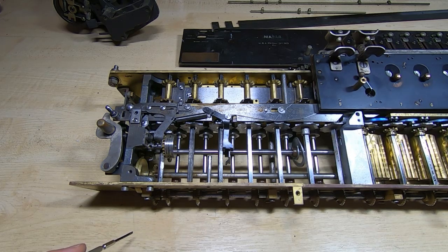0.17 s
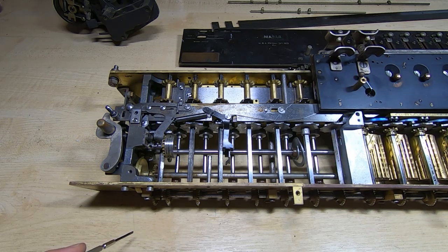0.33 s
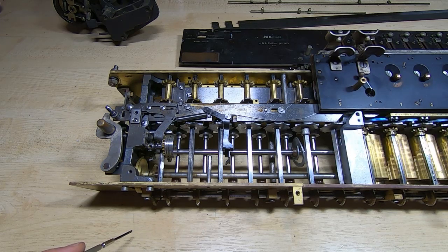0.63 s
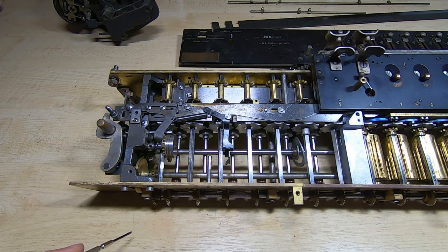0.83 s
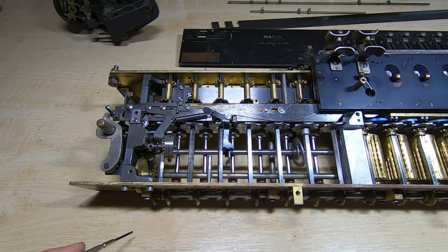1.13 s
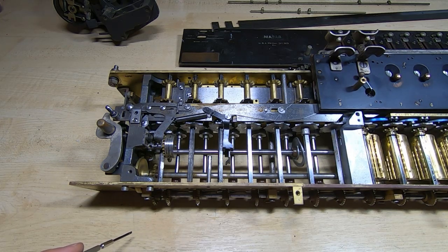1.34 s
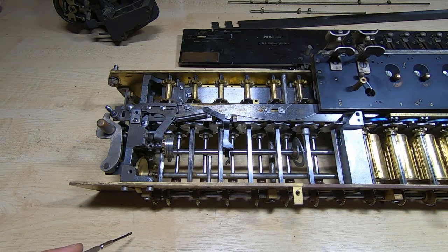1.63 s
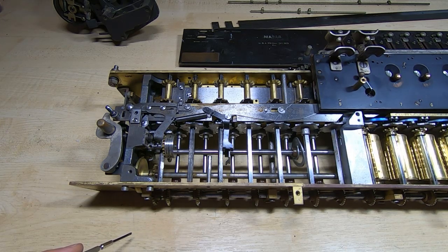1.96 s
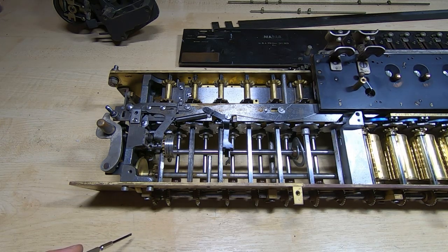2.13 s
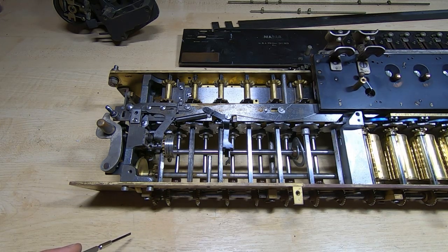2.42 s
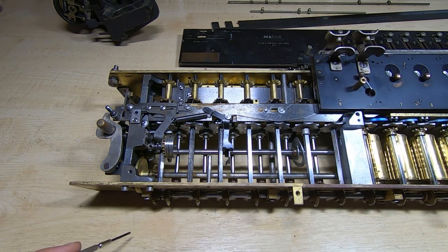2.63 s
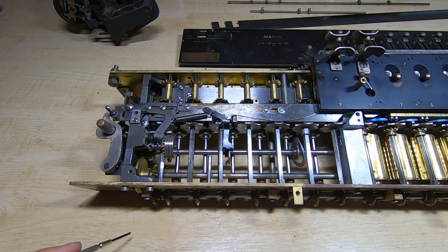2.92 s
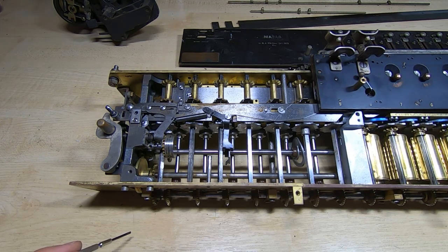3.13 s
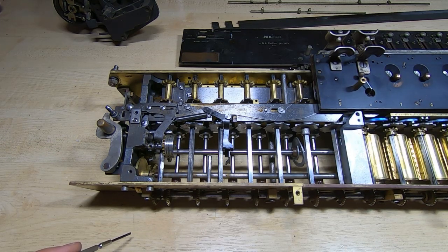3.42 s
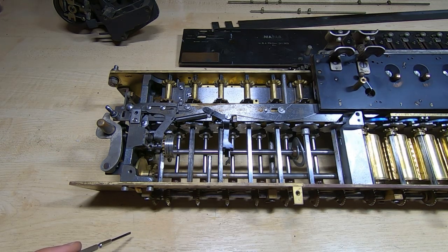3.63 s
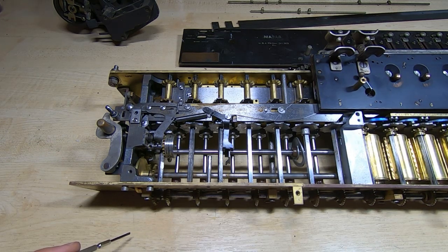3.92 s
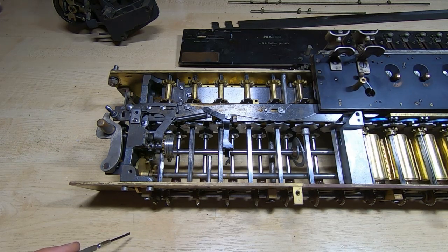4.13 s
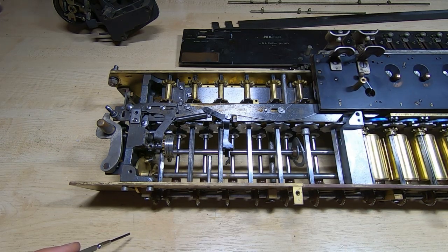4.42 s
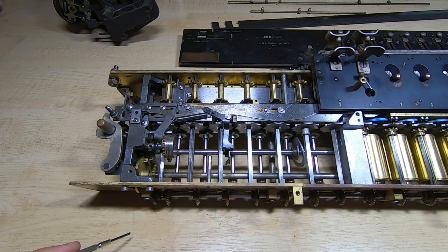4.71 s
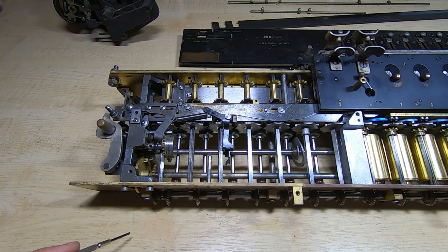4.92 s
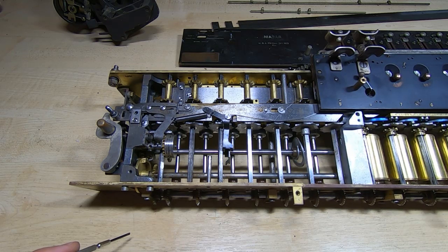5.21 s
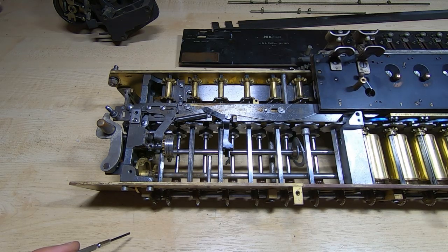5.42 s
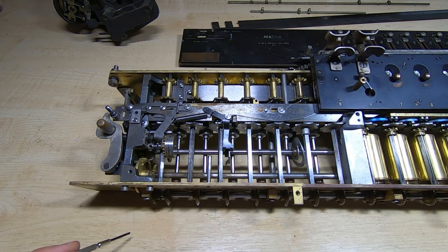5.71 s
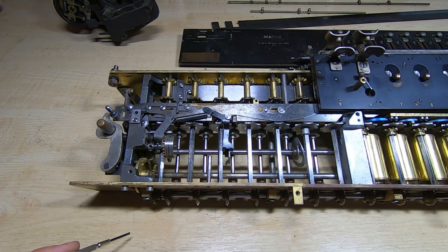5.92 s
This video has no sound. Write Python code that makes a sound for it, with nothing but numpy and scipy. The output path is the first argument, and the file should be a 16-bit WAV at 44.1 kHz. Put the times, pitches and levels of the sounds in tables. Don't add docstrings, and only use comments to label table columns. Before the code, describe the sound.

A quiet small room, close microphone, steady soft hiss and faint low mains hum throughout. An open mechanical calculator on a wooden bench is worked slowly by hand. A barely audible touch starts it, then a crisp metal click with a dull knock at 0.2 seconds. A tight cluster of clacks follows at 0.7, with a thin ringing pawl at 0.8. A softer knock at 1.35 leads to a bright, ringing snap at 1.5. Near silence follows, with only faint ticks, until a sharp clack at 2.9, then duller clicks at 3.3 and light ones around 3.9. At 4.15 a rapid burst of very bright snaps rattles the loose rods, with a small ping at 4.3. Weak ticks come at 5.0 to 5.2. From 5.4 clicks build quickly into the loudest, hard carriage slam at 5.46, with a low bench thud, quick rebounds and rattling; tiny ticks around 5.7 fade into hiss.

```python
import sys
import numpy as np
from scipy import signal
from scipy.fft import rfft, irfft
from scipy.io import wavfile
from scipy.ndimage import uniform_filter1d

SR = 44100
rng = np.random.default_rng(int(sys.argv[2]) if len(sys.argv) > 2 else 0)


def inscribe(sig):
    pcm = np.round(np.clip(np.atleast_2d(sig).T, -1, 1) * 32767)
    wavfile.write(sys.argv[1], SR, pcm.astype(np.int16))


def ratio_of_db(decibels):
    return 10 ** (np.asarray(decibels, float) / 20)


N = 267863
CUTOFF_HZ = 15800


def rms_one(x):
    return x / np.sqrt(np.mean(x ** 2))


def peak_one(x):
    return x / np.abs(x).max()


def at_hz(points, hz, column=1):
    points = np.array(points)
    return np.interp(np.log(hz), np.log(points[:, 0]), points[:, column])


def at_time(points, s):
    return np.interp(s, *np.transpose(points))


def high_pass(x, hz):
    return signal.sosfilt(signal.butter(2, hz, "high", fs=SR, output="sos"), x)


def ring(drive, hz, t60):
    radius = ratio_of_db(-60 / (t60 * SR))
    w = 2 * np.pi * hz / SR
    return signal.lfilter([0, np.sin(w)], [1, -2 * radius * np.cos(w), radius ** 2], drive + 1e-18)


def struck(strike, modes):
    click = np.zeros(N)
    click[int(strike[0] * SR) + np.array([0, 37, 95])] = ratio_of_db(strike[1]) * np.array([1, -.6, .4])
    return sum(ratio_of_db(db) * ring(click, hz, t60) * (-1) ** k for k, (hz, db, t60) in enumerate(modes))


# f/Hz, level/dB per Hz
HISS_SPECTRUM = [(20, -0.5), (50, -9), (100, -14.5), (155, -15), (175, -18.5), (300, -22), (1000, -29),
                 (2500, -33.5), (8400, -38.5), (16000, -41)]


def hiss():
    hz = np.maximum(np.fft.rfftfreq(N, 1 / SR), 8)
    spectrum = rfft(rng.standard_normal(N)) * ratio_of_db(at_hz(HISS_SPECTRUM, hz)) * (hz > 8)
    return ratio_of_db(-41.5) * rms_one(irfft(spectrum, N))


# f/Hz, rms level/dB
HUM_HARMONICS = [(50, -43), (150, -64)]


def hum():
    t = np.arange(N) / SR
    return sum(ratio_of_db(db) * np.sqrt(2) * np.sin(2 * np.pi * hz * t) for hz, db in HUM_HARMONICS)


# t/s, level/dB, centre f/Hz, loss per bounce/dB
KNOCKS = [(.0005, -32.5, 1160, 4), (.197, -22.5, 910, 3), (.2407, -37.5, 400, 2), (.6964, -20, 1030, 5),
          (.7134, -21.5, 1010, 3.5), (.74, -24.5, 650, 4.5), (.7961, -36, 1060, 3.5),
          (.8353, -33.5, 900, 4), (.8742, -35, 500, 4), (1.358, -23, 1200, 5.5), (1.5182, -25.5, 680, 2),
          (1.5365, -22.5, 1200, 3.5), (1.5785, -36, 700, 3.5), (2.8635, -20.5, 1060, 4),
          (2.8842, -24.5, 567, 5.5), (2.941, -34.5, 513, 5.5), (3.281, -22.5, 1660, 4),
          (3.3007, -23.5, 557, 5), (3.3458, -33, 356, 7), (3.8409, -34, 1230, 3.5), (3.9316, -29.5, 620, 2),
          (4.144, -24, 1080, 3.5), (4.1623, -23, 794, 7.5), (4.1789, -24, 1480, 10),
          (5.1031, -32.5, 1380, 4.5), (5.139, -34, 860, 7), (5.3693, -33.5, 600, 2),
          (5.4163, -21, 1550, 4.5)]
# t/s, level/dB, centre f/Hz
TOUCHES = [(.139, -41, 1100), (.178, -31, 1100), (.1876, -30, 1290), (.690, -32, 1000),
           (.8428, -33.5, 1650), (1.3364, -35, 1140), (1.347, -32.5, 750), (1.4127, -36, 305),
           (1.507, -31, 1200), (1.514, -29, 1100), (2.7152, -37.5, 1550), (2.855, -27, 1510),
           (3.2712, -30, 1140), (3.927, -32.5, 1290), (3.996, -40, 500), (4.137, -30, 895),
           (4.153, -30, 1400), (4.1935, -30, 1460), (4.206, -32, 1440), (4.2336, -35.5, 734),
           (5.024, -40, 1510), (5.048, -45, 1500), (5.1135, -36, 1340), (5.1679, -37, 800),
           (5.184, -40, 1400), (5.408, -29, 460), (5.738, -40, 2100)]
# t/s, level/dB, centre f/Hz, loss per bounce/dB
CARRIAGE_DROP = [
    (5.4617, -5.5, 1280, 12),
    (5.4773, -12.5, 1960, 11),
    (5.4887, -18.5, 424, 8),
    (5.5252, -22, 1500, 7),
    (5.5669, -30.5, 1250, 4.5),
]
BOUNCE_S, BOUNCE_JITTER = .0105, 0.252
SAG_OCT, SAG_SPREAD_OCT = 0.19, .2


def all_knocks():
    rows, bounce = list(TOUCHES), np.arange(4)
    for s, db, hz, loss_db in list(KNOCKS) + list(CARRIAGE_DROP):
        late, off = np.clip(rng.standard_normal((2, len(bounce))), -2, 2) * (bounce > 0)
        times = s + BOUNCE_S * (bounce + BOUNCE_JITTER * late)
        pitches = hz * 2 ** (SAG_SPREAD_OCT * off - SAG_OCT * bounce)
        rows += zip(times, db - loss_db * bounce, pitches)
    return np.array(rows)


# f/Hz, level/dB, T60/s
FRAME_MODES = [(306, -5, 0.13), (392.3, 1.5, 0.17), (469, -4, 0.11), (567, 1, 0.14), (644, -10, 0.019),
               (761.3, -3.5, 0.18), (893, -10.5, 0.16), (995, -8, 0.065), (1166, -3, 0.078),
               (1320, -7.5, 0.1), (1460, -7, 0.07), (1554, -4, 0.091), (1802, -4, 0.054), (1940, -8, .08),
               (2053, -17, 0.047), (2410, -7.5, .09)]


def frame(knocks):
    s, knock_db, knock_hz = knocks.T
    at = (s * SR).astype(int)
    signs = rng.choice([-1, 1], (len(s), len(FRAME_MODES) + 1))
    out, t = np.zeros(N), np.arange(1024) / SR
    for i, db, hz, sign in zip(at, knock_db, knock_hz, signs[:, -1]):
        thud = np.sin(2 * np.pi * hz * t) * np.minimum(t / 0.0014, 1) * ratio_of_db(-60 * t * hz / 13.2)
        out[i:i + len(t)] += sign * ratio_of_db(db - 3.5) * peak_one(thud)
    for k, (hz, db, t60) in enumerate(FRAME_MODES):
        clicks = np.zeros(N)
        clicks[at] = signs[:, k] * ratio_of_db(knock_db + db - 9 - 7.4 * np.log2(hz / knock_hz) ** 2)
        soft = np.hanning(int(SR / hz))
        out += ring(signal.fftconvolve(clicks, soft / soft.sum() * 2)[:N], hz, t60)
    return high_pass(out, 190)


# t/s, tick peak level/dB, part f/Hz, ring T60/s
SNAPS = [(0.1855, -10.5, 12200, 0.023), (.202, -21.5, 7460, 0.017), (0.7079, -9.5, 11300, .012),
         (0.7213, -10.5, 13180, 0.021), (.79, -14.5, 13600, 0.014), (.839, -20.5, 11800, 0.019),
         (1.3463, -21, 12200, .011), (1.5222, -7.5, 11700, 0.031), (1.545, -16.5, 13330, .012),
         (2.004, -41, 11300, 0.025), (2.873, -12.5, 8360, 0.013), (3.279, -14, 12000, 0.032),
         (3.293, -17, 8330, 0.024), (4.138, -7.5, 13840, 0.035), (4.156, -11.5, 7130, 0.013),
         (4.1739, -8.5, 10940, 0.035), (4.177, -10.5, 12800, 0.018), (4.205, -23.5, 11700, 0.062),
         (4.2952, -19.5, 13010, 0.022), (5.457, -23, 11300, .012), (1.5334, -21, 12300, .012),
         (5.165, -38, 5400, .027), (5.433, -12, 5920, 0.018), (5.439, -20, 9000, .012),
         (1.361, -27, 4180, 0.016)]
# t/s, tick peak level/dB, part f/Hz, rod rattle level re tick/dB
TEETH = [(.001, -35.5, 4740, -9), (.176, -29.5, 2880, -9), (.192, -13.5, 3490, -15),
         (.693, -15.5, 5750, -11), (.701, -23, 2970, -4), (1.354, -23, 2900, -11), (1.514, -22, 3050, -13),
         (2.7153, -30, 2520, -10), (2.855, -27, 3250, -10), (2.861, -23.5, 2860, -7),
         (2.8844, -8.5, 6100, -14), (3.275, -28.5, 4330, -1), (3.8413, -24.5, 4600, -13),
         (3.9253, -29, 2700, -9), (4.274, -36, 3140, -14), (5.0209, -31.5, 3330, -11),
         (5.1027, -34.5, 3900, -12), (5.149, -33.5, 5200, -16), (5.3666, -29, 3400, -9.5),
         (5.406, -18, 3400, -6.5), (5.4143, -10, 2900, -6.5), (5.426, -5.5, 3460, -14),
         (5.46, 1.5, 4000, -14), (5.479, -9, 2000, -25), (5.4992, -12, 2000, -13), (5.527, -19, 4350, -13),
         (5.568, -24.5, 2840, -10), (5.583, -27, 3000, -14), (5.705, -28, 5500, -19),
         (5.739, -36, 2330, -14)]
# t/s, rattle T60/s
SLACK = [(.2, 0.22), (.72, 0.22), (.8, .25), (1.35, .16), (1.53, 0.24), (2.87, 0.23), (3.28, 0.21),
         (3.9, 0.21), (4.15, 0.19), (4.3, .23), (5.1, .24), (5.4, 0.14), (5.43, 0.08), (5.46, 0.2),
         (5.57, 0.28), (5.72, 0.15)]
SNAP_RATTLE_DB, SNAP_STIFFNESS = -14.5, 0.25
TOOTH_RING_T60_S = 0.013
CHATTER_S, CHATTER_LOSS_DB, CHATTER_RATTLE_DB, CHATTER_SPREAD_OCT = .022, 16.5, -17, 0.47


def all_contacts():
    first = []
    for s, db, hz, t60 in SNAPS:
        first.append((s, db, hz, t60, SNAP_RATTLE_DB - SNAP_STIFFNESS * (db + 15.5)))
    for s, db, hz, rattle_db in TEETH:
        first.append((s, db, hz, TOOTH_RING_T60_S, rattle_db))
    again = []
    for (s, db, hz, _, _), (late, off) in zip(first, rng.random((len(first), 2))):
        again_hz = min(hz * 2 ** (CHATTER_SPREAD_OCT * (2 * off - 1)), 14000)
        again_s = s + CHATTER_S * (.5 + late)
        again.append((again_s, db - CHATTER_LOSS_DB, again_hz, TOOTH_RING_T60_S, CHATTER_RATTLE_DB))
    rows = np.array(first + again)
    return np.column_stack([rows, at_time(SLACK, rows[:, 0])])


# t/s, treble slope above 5 kHz/dB per octave
OPENNESS = [(.19, -0.5), (.7, -1), (.8, -1), (1.35, -2.5), (1.52, 0.5), (2.72, 0.5), (2.88, -5.5),
            (3.28, -0.5), (3.88, -4), (4.15, 1), (4.3, 0), (5.02, -5), (5.15, -7), (5.37, -3), (5.42, 3),
            (5.46, 2), (5.53, 2.5), (5.7, -7)]


def ticks(contacts):
    out, t = np.zeros(N + 4096), np.arange(4096) / SR
    for s, tick_db, hz, t60, _, _ in contacts:
        envelope = np.exp(-(t / 0.0023) ** 1.47) * np.minimum(t / 0.00037, 1)
        contact = rng.standard_normal(len(t)) * envelope
        near = np.minimum(hz * (1 + 0.0089 * rng.standard_normal(3) * [0, 1, 2]), CUTOFF_HZ)
        part = sum(share * ring(contact, f, max(t60, .003)) for f, share in zip(near, (1, .7, .6)))
        held = np.clip((t60 / 0.039) ** 2, 0, 1)
        crisp = np.clip(hz / 9000 + (tick_db + 24.0) / 30, .15, .8)
        crisp *= ratio_of_db(0.65 * at_time(OPENNESS, s))
        crack = peak_one(high_pass(contact + 1e-18, 2400))
        body = peak_one(ring(contact, hz, 1.24 / hz))
        tick = crisp * crack + 0.38 * body + 1.64 * held * peak_one(part)
        out[int(s * SR):][:len(t)] += ratio_of_db(tick_db) * peak_one(tick)
    return out[:N]


def dying(times, db, t60, rise_s):
    step = 16
    power, t = np.zeros(N // step + 1100), np.arange(640) * step / SR
    decay_db = db[:, None] - 60 * t / np.maximum(t60, .01)[:, None]
    shapes = ratio_of_db(decay_db) ** 2 * (1 - np.exp(-t / rise_s))
    for s, shape in zip(times, shapes):
        power[int(s * SR / step):][:len(t)] += shape
    return np.interp(np.arange(N) / step, np.arange(len(power)), np.sqrt(power))


# f/Hz, level/dB per third octave, decay factor/1
RODS = [(254, -17.5, 1.24), (594, -14, 0.73), (1200, -14, 0.96), (2500, -13, 0.87), (5400, -15, 0.9),
        (9100, -9, 0.72), (13000, -10, 0.72), (15500, -10, 0.61)]
KNOCK_TAIL_T60_S = .16


def rods(contacts, knocks):
    s, tick_db, part_hz, _, rattle_db, rattle_t60 = contacts.T
    knock_s, knock_db, knock_hz = knocks.T
    grain_db = 2.75 * np.minimum(rng.exponential(1, (2, N)), 6)
    grains = rng.standard_normal((2, N)) * ratio_of_db(grain_db)
    uneven = rng.standard_normal((len(contacts), 20))
    times = np.append(knock_s, s)
    last = np.append(np.full(len(knock_s), KNOCK_TAIL_T60_S), rattle_t60)
    out, edges = np.zeros(N), 180 * 2 ** (np.arange(21) / 3)
    for k, (low, high) in enumerate(zip(edges, edges[1:])):
        hz = np.sqrt(low * high)
        band = signal.sosfilt(signal.butter(2, [low, high], "band", fs=SR, output="sos"), grains[k % 2])
        by_knocks = knock_db - 2.6 * np.log2(hz / knock_hz) ** 2 - 1.25
        by_knocks -= 10 * np.log10(1 + (hz / 2000) ** 6)
        by_ticks = tick_db + rattle_db - 1.5 * np.log2(hz / part_hz) ** 2 + 2.5
        by_ticks -= 10 * np.log10(1 + (1700 / hz) ** 6)
        by_ticks += at_time(OPENNESS, s) * max(np.log2(hz / 5000), 0)
        by_ticks += 2.1 * uneven[:, k]
        db = np.append(by_knocks, by_ticks) + at_hz(RODS, hz)
        t60 = last * at_hz(RODS, hz, column=2)
        out += rms_one(band) * dying(times, db, t60, rise_s=0.00044 + 5.9 / hz)
    return out


# f/Hz, level/dB, T60/s
PAWL_A = (.7905, -28)
PAWL_A_MODES = [(1074, -1.5, .1), (2780, -9, 0.037), (3280, -1.5, 0.043), (3620, -4, .04), (5900, -8, .08),
                (6100, -3, 0.12), (6220, -4, 0.17), (6320, 0, 0.085), (9200, -6, .08), (9400, -8, .08),
                (9400, 2, .09), (11684, -2, .07), (13100, -4, .12), (13300, -3, .15), (13500, -1, 0.12),
                (13668, -5, .1)]
PAWL_B = (4.2955, -33.5)
PAWL_B_MODES = [(1070, -3.5, 0.13), (2900, -6, .05), (3156, -3, 0.058), (3232, -1, 0.061),
                (4850, -14, 0.09), (5700, -16, 0.11), (8177, -1, 0.085), (8400, 1, 0.11), (8600, -10, 0.1),
                (11770, 0, .06), (13000, -2, .06), (13400, -3, .08)]


def pawls():
    return struck(PAWL_A, PAWL_A_MODES) + struck(PAWL_B, PAWL_B_MODES)


# f/Hz, level/dB, T60/s
DRUM = (1.5225, -24)
DRUM_MODES = [(3170, -5, 0.065), (6070, 2, 0.061), (8330, 5.5, .06), (8620, 2, 0.097), (9140, -2, .07),
              (12700, -1, .05)]


def drum():
    return struck(DRUM, DRUM_MODES)


# f/Hz, level/dB, T60/s
BENCH = (5.466, -22.5)
BENCH_MODES = [(151, -5, 0.54), (188, 2.5, 0.2), (232, -6.5, 0.23)]


def bench():
    return high_pass(struck(BENCH, BENCH_MODES), 125)


def scene():
    contacts, knocks = all_contacts(), all_knocks()
    machine = frame(knocks) + ticks(contacts) + rods(contacts, knocks) + pawls() + drum()
    mid = hiss() + hum() + machine + bench()
    flutter = rms_one(uniform_filter1d(rng.standard_normal(N), size=24))
    trace = ratio_of_db(-25) * flutter * signal.lfilter([1, -1], [1, -.93], mid)
    return np.array([mid + trace, mid - trace])


def top_cut(x):
    return signal.sosfilt(signal.butter(12, 16790, fs=SR, output="sos"), x)


def record(dry):
    cut = signal.sosfilt(signal.ellip(12, .5, 55, CUTOFF_HZ, fs=SR, output="sos"), dry)
    mix = np.clip(cut, -1, 1)
    return top_cut(mix)


dry = scene()
out = record(dry)
inscribe(out)
```